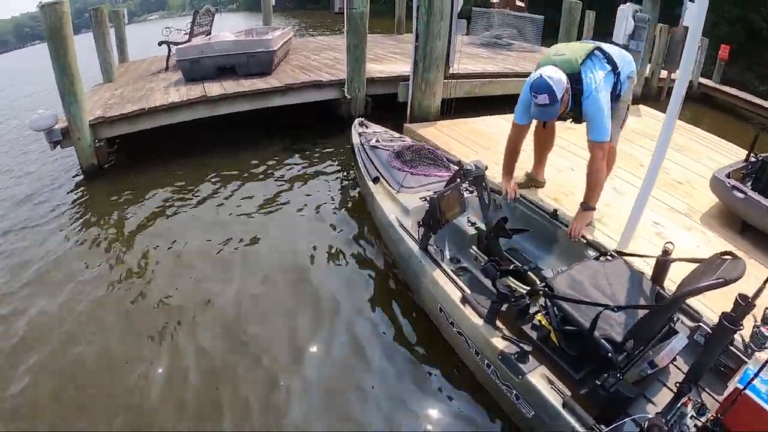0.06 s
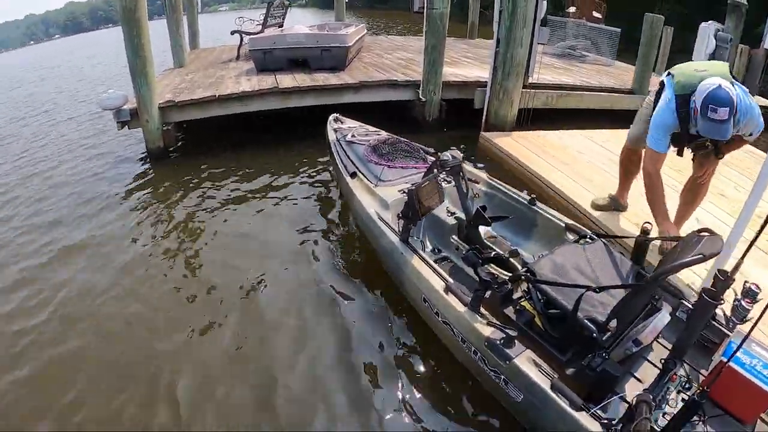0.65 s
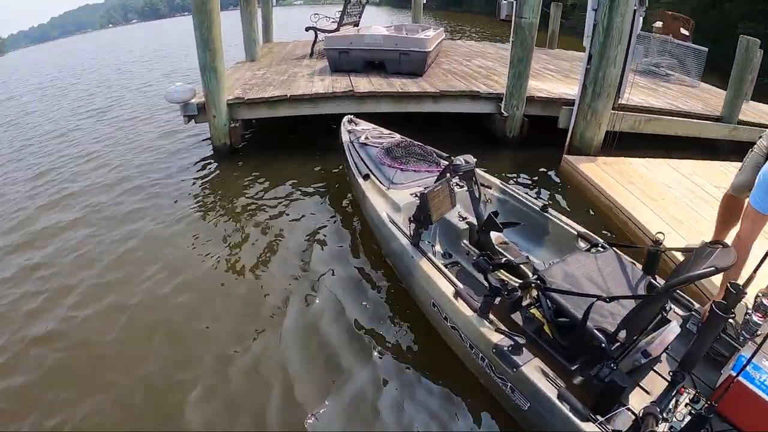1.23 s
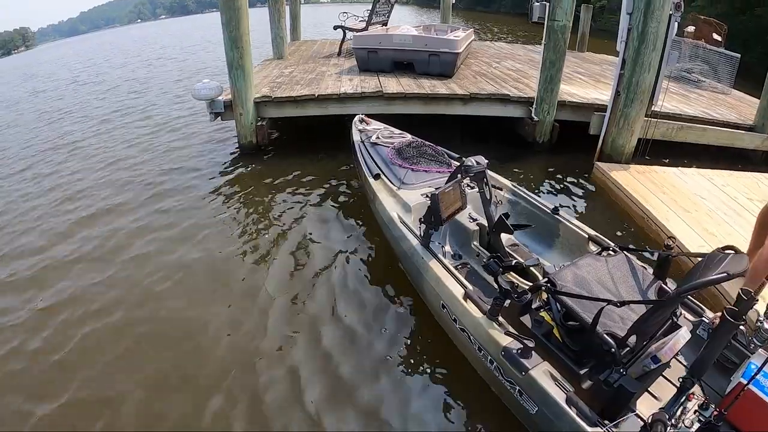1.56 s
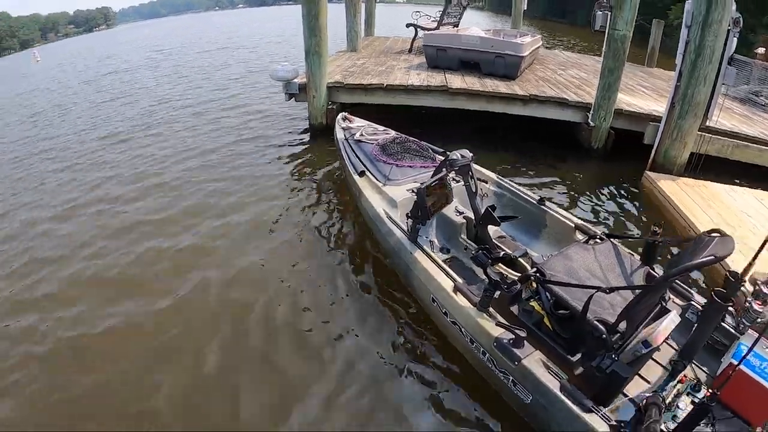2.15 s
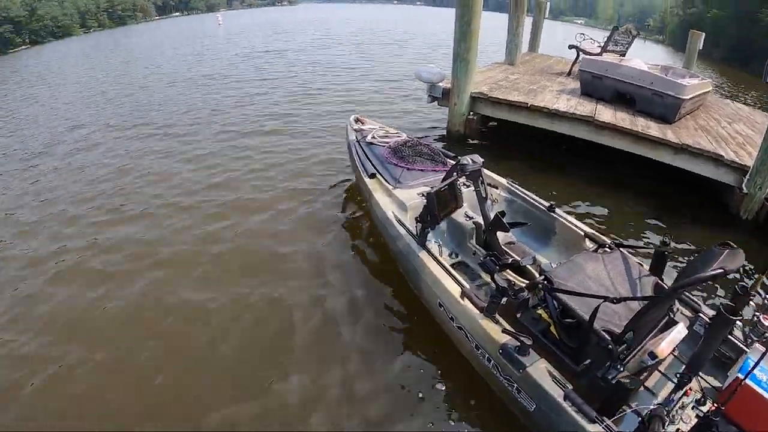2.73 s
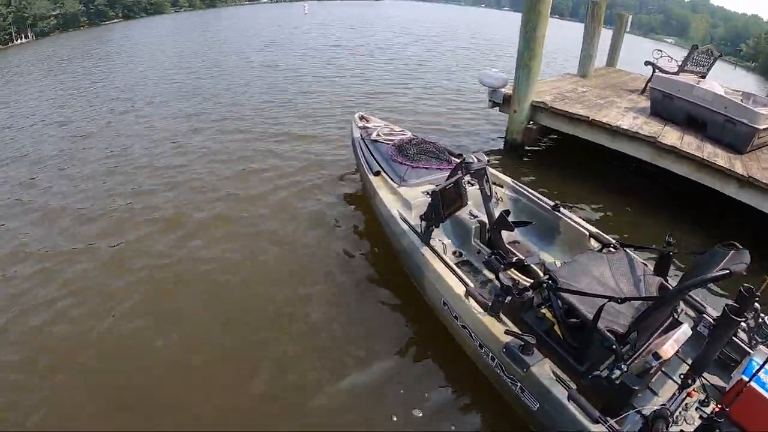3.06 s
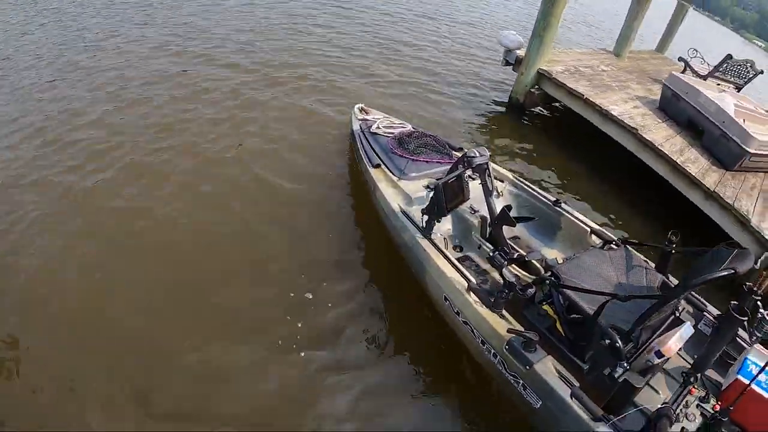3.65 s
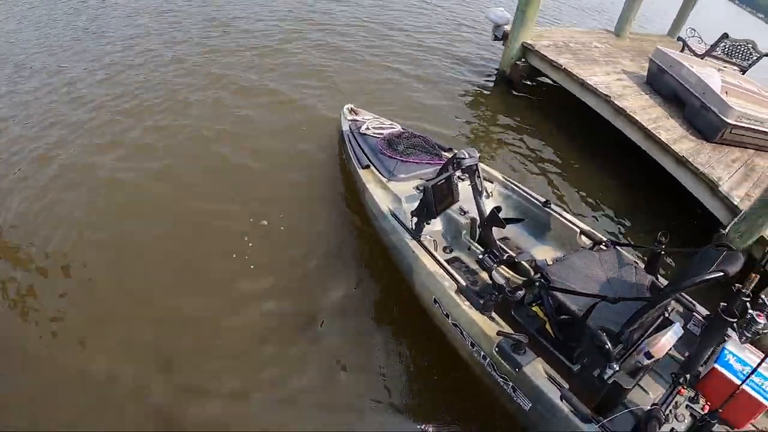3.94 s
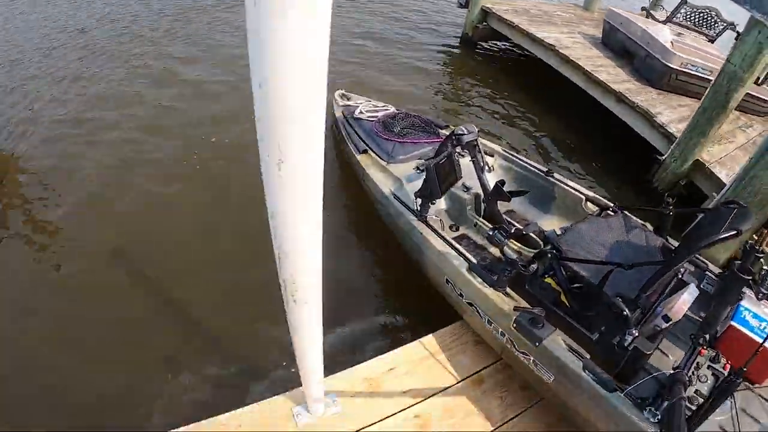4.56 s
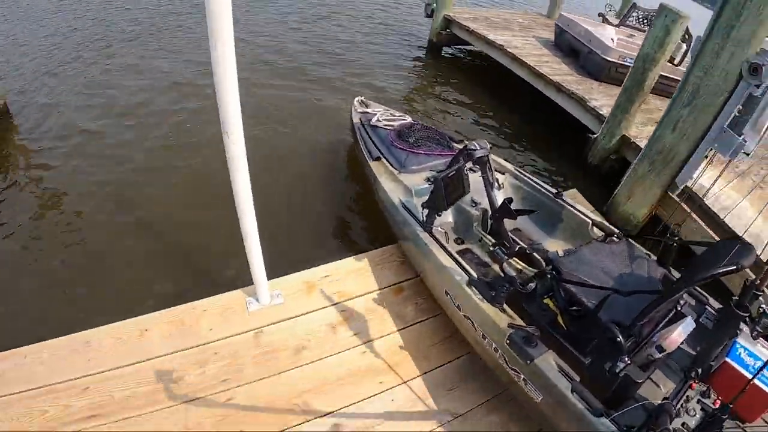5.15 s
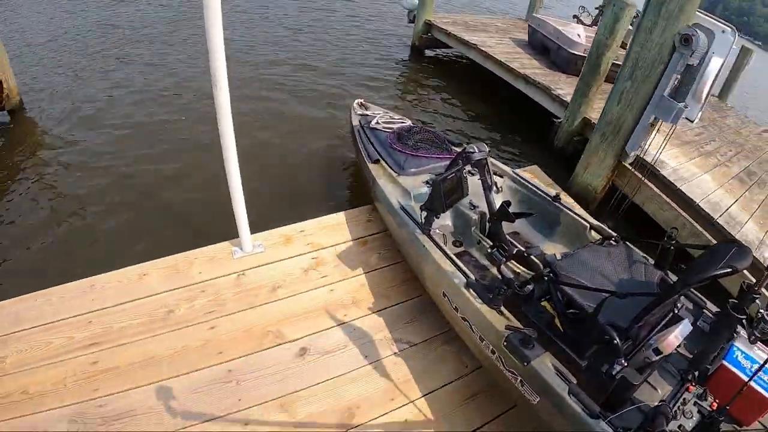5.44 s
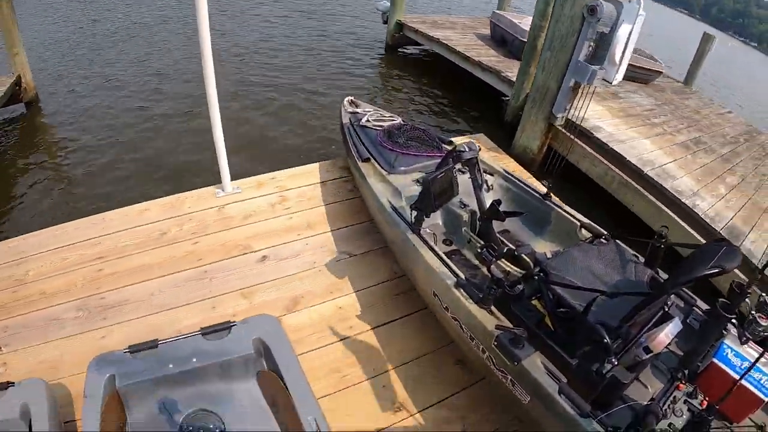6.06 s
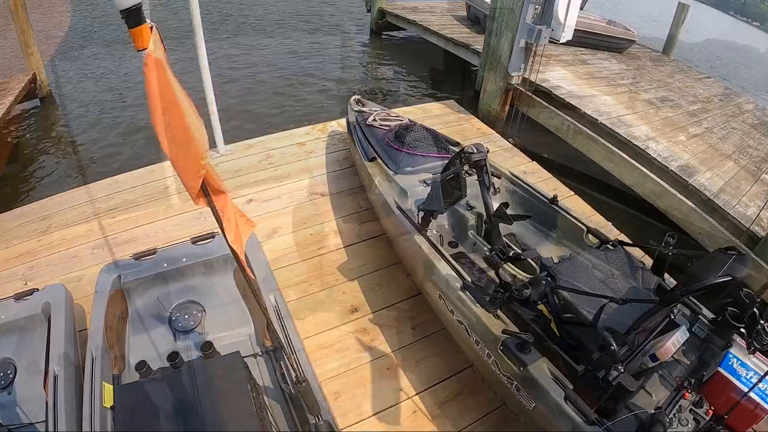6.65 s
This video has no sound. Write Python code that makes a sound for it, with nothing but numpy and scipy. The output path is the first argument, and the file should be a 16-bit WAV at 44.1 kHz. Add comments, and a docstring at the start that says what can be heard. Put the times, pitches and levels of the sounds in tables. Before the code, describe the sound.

Water drips and laps softly as a plastic kayak thumps against a dock, its gear clacking, and is dragged over wooden boards.

```python
"""Water laps and drips, then a hollow plastic fishing kayak bumps a wooden dock and its fittings rattle.
The kayak is led along the dock and hauled up onto it, so the hull scrapes over the planks
while slaps of water trap pockets of air that plop under it. Gear clicks and rustles close by,
gusts touch the microphone, and a faint hum lies under the quiet lake."""
import sys
import numpy as np
from scipy import signal
from scipy.fft import rfft, irfft, next_fast_len
from scipy.io import wavfile
from scipy.ndimage import uniform_filter1d

SR = 44100
rng = np.random.default_rng(int(sys.argv[2]) if len(sys.argv) > 2 else 0)


def inscribe(sig):
    """Save sig as 16-bit PCM at rate SR to the path in sys.argv[1].

    A 1-D sig is mono; a 2-D sig holds one channel per row.
    Samples are clipped to [-1, 1] before scaling.
    """
    pcm = np.round(np.clip(np.atleast_2d(sig).T, -1, 1) * 32767)
    wavfile.write(sys.argv[1], SR, pcm.astype(np.int16))


N = 299873
TIME = np.arange(N) / SR

# Tone colours of noises. Each row: frequency in Hz, relative strength there in dB.
AIR_COLOUR = [(880, -43), (1500, -7), (2590, -16), (4080, -2), (5170, -40), (10300, -5), (15100, -7),
              (16000, -6)]
SLOSH_COLOUR = [(15, -38), (25, -19), (54, -7.5), (125, -7), (156, -5), (219, -2.5), (291, -9), (320, -7.5),
                (382, -14), (420, -10.5), (550, -22), (920, -120)]
RUMBLE_COLOUR = [(15, -51), (25, -28), (75, -15), (129, -12), (214, -2.5), (259, -4.5), (313, -3.5),
                 (344, -23), (420, -4), (550, -54), (920, -120)]
LAPPING_COLOUR = [(210, -38), (360, 6), (392, -53), (420, -4), (709, -3.5), (766, -17.5), (835, -10),
                  (1410, -15), (2800, -46), (3640, -33), (6160, -120)]
GRINDING_COLOUR = [(210, -6), (360, -1), (417, -7.5), (446, 1.5), (577, 2.5), (864, -6.5), (958, -6),
                   (1180, -9), (2800, -26.5), (3640, -45), (6160, -120)]
HISS_COLOUR = [(1410, -12), (2400, -11), (3200, 0.5), (4050, -0.5), (4830, -3.5), (5400, -4.5),
               (5900, -6.5), (6700, -4), (8300, -3.5), (10400, -1), (12000, -3), (14100, -4), (16000, -16)]
FIZZ_COLOUR = [(1400, -39), (2800, 0), (5000, -1), (9000, -0.5), (15000, -10)]
WIND_COLOUR = [(20, -12), (55, 6.5), (140, 0.5), (260, -13)]
FABRIC_COLOUR = [(710, -54), (1200, 3), (2430, 2), (3010, 2), (4220, 3), (5650, 5), (10400, 0), (13500, -6),
                 (16000, -7)]
FROTH_COLOUR = [(1400, -6), (2000, -3), (3000, -1), (4500, -5.5), (7000, -9.5), (9000, -12)]
SHRILL_COLOUR = [(5100, -12), (5400, -5), (5700, -11)]
FLAG_COLOUR = [(1200, -3), (3000, -4), (4200, 1), (5600, -3), (10400, 1), (13500, -3), (16000, -7)]
# Sounds that swell and die away. Each row: start, loudest moment and end in seconds, level in dB.
# A row that ends before it starts is silent.
SPLASHES = [(.16, .21, 0.33, -53.5), (2.365, 2.378, 2.39, -48.5), (2.4, 2.44, 2.66, -55.5),
            (2.53, 2.54, 2.56, -57), (3.26, 3.274, 3.21, -35), (3.365, 3.382, 3.52, -52.5),
            (3.484, 3.492, 3.53, -39), (3.49, 3.565, 3.98, -45.5), (3.62, 3.655, 2.9, -76),
            (4.01, 4.025, 4.16, -45), (4.075, 4.09, 4.13, -43), (4.125, 4.145, 3.7, -46),
            (4.8, 4.826, 4.87, -45), (4.86, 4.9, 4.45, -41), (5.37, 5.41, 5.55, -49.5)]
GUSTS = [(.4, 1.1, 2.1, -53), (4.5, 4.7, 5.1, -39), (6.47, 6.52, 6.87, -31)]
SWISHES = [(.44, .5, 0.58, -41), (.51, .532, 0.56, -35.5), (4.21, 4.274, 4.55, -47), (4.4, 4.42, 4.52, -50),
           (5.85, 6.23, 7.4, -53.5)]
GURGLES = [(2.08, 2.3, 2.52, -50.5), (3.49, 3.57, 4.33, -51), (3.95, 4.08, 4.4, -54.5)]
FLAG = [(6.35, 6.46, 6.525, -36)]

# A distant hum. Each row: pitch in Hz, level in dB.
HUM_TONES = [(161.5, -57), (323, -48.5), (425.3, -58.5)]
# How hard the hull is dragged. Each row: time in seconds, effort in dB.
EFFORT = [(0.0, -52), (0.51, -50), (0.91, -57), (2.56, -53.5), (2.93, -52.5), (3.27, -49.5), (3.56, -52),
          (3.88, -37.5), (4.22, -39.5), (4.53, -58.5), (4.7, -33.5), (4.85, -39.5), (5.15, -43),
          (5.74, -42.5), (5.81, -41), (6.48, -36.5), (6.7, -44.5), (6.8, -42)]
# How much of the hull lies on the planks. Each row: time in seconds, share from 0 to 1.
AGROUND = [(0, 0.17), (3.3, 0.27), (3.8, 0.68), (4.25, 0.45), (4.7, 1), (6.8, 0.91)]
# The nearest drops. Each row: time in seconds, level in dB, pitch in Hz.
DRIPS = [(0.194, -29.5, 7440), (0.528, -24, 4670), (0.604, -33, 7300), (0.632, -27, 2350),
         (0.695, -38, 5070), (0.741, -33.5, 8100), (0.8063, -34, 3960), (0.895, -35, 3580),
         (1.057, -36, 5900), (1.289, -38, 6040), (2.0197, -31.5, 3290), (2.0454, -30.5, 7800),
         (2.333, -24.5, 3410), (2.432, -21, 1400), (2.4875, -28.5, 3720), (2.6, -28.5, 5040),
         (2.618, -29.5, 1260), (2.8051, -25.5, 2930), (2.909, -29, 1700), (3.0041, -32, 2920),
         (3.148, -29.5, 3860), (3.178, -31, 5300), (3.3757, -22.5, 5570), (3.527, -25.5, 3380),
         (3.557, -24, 2700), (3.58, -41, 1680), (3.652, -30, 2000), (3.672, -26, 2790), (3.847, -34, 4000),
         (3.9285, -24, 4500), (4.088, -16, 4050), (4.212, -30, 4430), (4.821, -26, 4190)]
# A fade time (t60) is how long a ring takes to fall by 60 dB. A mode is one tone that an object rings at.
# The four bands of a blow: boom, knock, clack and tick. Each row: low and high edge in Hz,
# multiple of the blow's fade time, boost of the dense overtones in dB.
BLOW_BANDS = [(36, 414, 2.56, 0), (418, 864, 1.72, 5.5), (934, 2440, 0.6, -2), (3040, 10800, 1.17, 40)]
# The hull hits the dock. Each row: time in seconds; level, panel ring and brightness in dB;
# base fade time in seconds; pitch in Hz; boost of the side wall in dB.
BUMPS = [(0.302, -18, 6, 12, 0.044, 239, -7), (0.311, -12, -11, -2, 0.082, 205, -10),
         (0.329, -18, 3.5, 5.5, 0.12, 199, -4), (1.195, -39, 6, -22, 0.18, 199, 1),
         (1.645, -26, -2.5, -10, 0.1, 207.4, 4), (1.912, -12, -2, -7, 0.044, 216.6, -6),
         (1.938, -21.5, -1, -6, 0.094, 212, -10), (3.107, -28, -6, -13, 0.13, 216.5, -14),
         (3.132, -25.5, -6, -14, 0.23, 212.4, -7), (3.174, -25.5, 3, -8, 0.048, 213, 2),
         (3.194, -20.5, -10, -18, 0.061, 214, 10.5), (3.272, -28.5, 1, -7, 0.12, 215.4, -4),
         (3.712, -14, -3, -9, 0.1, 215.7, 10), (3.73, -24.5, 8, 5.5, .085, 222.6, -3),
         (3.789, -19, -12, -12, 0.052, 217, 3), (3.823, -18.5, -2, 4, 0.053, 204, 2),
         (4.259, -23, -2, 0, .06, 160, -7), (4.292, -20, 2, 14, 0.075, 211, -8),
         (4.363, -19, 7.5, -4, 0.033, 234, 1), (4.378, -17.5, 3, 8.5, 0.027, 221, 3),
         (4.400, -22, 8, 5, 0.014, 195, 12), (4.648, -38, 13, 8, 0.087, 236, 0),
         (4.66, -19.5, 8, 2, 0.063, 243, 8.5), (4.701, -23.5, 9, 7, 0.027, 221, 8),
         (4.721, -24, 4, 3.5, 0.048, 237, 1), (6.487, -14, 3.5, 9, 0.074, 228, 7),
         (6.513, -17.5, 6.5, -2, 0.097, 225.6, 6), (6.586, -15, 7, 1, 0.067, 229.4, 5.5)]
# The whole hull, and one panel. Each row: multiple of the pitch, level in dB, multiple of the fade time.
HULL_MODES = [(.769, -10, 2.16), (1, 0, 1.92), (1.2, -10, 2.1), (2.5, -2, 0.69), (2.85, -3.5, 0.81),
              (3.5, -15, 0.43), (5.07, -9.5, 0.6), (6.05, -8.5, 0.24), (7.6, -15, 0.47)]
PANEL_MODES = [(0.409, -19, 5.8), (0.999, -0.5, 0.87), (1.109, -17.5, 1.2), (1.36, -5, 0.47),
               (1.624, -12.5, 0.82), (1.849, -18.5, 1.7), (2.1, -29, 2.2), (2.75, -15, 0.14),
               (3.4, -48, 1.2)]
# A loose fitting chatters. Each row: start in seconds, level in dB, number of touches.
RATTLES = [(0.308, -20, 1), (0.314, -14, 4), (1.9119, -22.5, 1), (1.921, -30.5, 4), (4.383, -23, 1),
           (4.4103, -35, 1), (4.4147, -25.5, 3), (4.6708, -14.5, 1), (6.1624, -27, 1), (6.2134, -29, 2),
           (6.445, -27, 2)]
# The fitting, and the dock's deck. Each row: pitch in Hz, level in dB, fade time in seconds.
FITTING_MODES = [(4180, -13, 0.023), (4590, -2.5, 0.01), (4790, -9.5, 0.0092), (8100, -8, 0.0025),
                 (9400, -27, 0.008), (12400, -20, .004)]
DOCK_MODES = [(61.5, -5, 0.31), (103, -2.5, 0.2), (135.5, -2, 0.23)]
# The dock gives way a little. Each row: time in seconds, level in dB.
THUDS = [(0.324, -25), (1.923, -29), (3.816, -28.5), (4.385, -30), (4.664, -33.5), (6.507, -23.5)]
# Hollow knocks. Each row: time in seconds, level and brightness in dB, pitch in Hz,
# base fade time in seconds.
KNOCKS = [(0.374, -47.5, 5, 506, 0.047), (1.362, -53, -1.5, 555, 0.048), (2.431, -56, 10.5, 657, .09),
          (2.616, -46, 1, 496, 0.056), (2.908, -56.5, 6, 480, 0.062), (3.486, -46, -3, 555, 0.091),
          (3.867, -24, -2, 486, 0.04), (3.89, -30, -7, 634, 0.039), (4.239, -37, 5.5, 603, 0.054),
          (4.502, -37.5, -3.5, 649, 0.1), (4.776, -35, -3.5, 553, 0.11), (4.903, -43.5, -7, 565, 0.06),
          (5.5, -38.5, -15, 573, 0.096), (5.753, -38, -13, 562, 0.12), (5.826, -37.5, -10, 570, 0.14),
          (6.181, -34.5, 4.5, 578, 0.085), (6.34, -33, -22, 688, 0.058), (6.366, -39, -22, 554, 0.061)]
# Light clicks of gear. Each row: time in seconds, level in dB, centre frequency in Hz.
TICKS = [(.507, -44, 3000), (0.53, -43, 2600), (.537, -47, 2190), (4.09, -33, 5930), (4.721, -37.5, 3920),
         (4.966, -41, 3400), (5.033, -41, 11000), (5.175, -38.5, 4280), (5.217, -43, 11500),
         (5.3, -46, 3600), (5.418, -45, 12000), (5.489, -38.5, 9400), (5.817, -42.5, 8500),
         (6.212, -40, 8500), (6.699, -41, 5800), (6.713, -44, 3470)]
# Sharp snaps of gear. Each row: time in seconds; level, brightness and lean to the left in dB;
# factor on the tick's fade time; base fade time in seconds.
SNAPS = [(3.8668, -47, 18, -0.5, 0.78, 0.041), (4.28, -2, -14.5, -26, 0.29, 0.053),
         (4.4016, -28.5, 2.5, -23, 1, 0.023), (6.497, -35, 14, 18, 0.68, 0.051),
         (6.506, -33.5, 11.5, -16, 0.49, 0.058)]
# Stiff plastic gear. Each row: pitch in Hz, level in dB, multiple of the fade time.
GEAR_MODES = [(175, -8, 2.6), (570, 1.5, 0.91), (753, 3.5, 0.81), (940, -10, 1.3), (1320, -6, 0.7),
              (1580, -4, 0.9), (1840, -14, 1.17)]
# How loud the high, thin noise is. Each row: time in seconds, level in dB.
SHRILL_LEVEL = [(0, -98), (4.7, -90), (5.1, -64), (6.1, -63), (6.5, -76), (6.8, -80)]
# Water slaps under the hull. Each row: time in seconds; slap level, slap brightness and
# air pocket level in dB; pitch in Hz; how long the note holds in seconds.
PLOPS = [(5.013, -30.5, -6.5, -22.5, 517, 0.029), (5.154, -27, -13, -24, 542, 0.027),
         (5.326, -30, -6, -28, 643, 0.0099), (5.656, -25, -3, -26, 582.6, 0.016),
         (5.987, -24.5, -3.5, -17, 535, 0.02), (6.322, -29, -3.5, -42, 486, 0.012),
         (6.778, -31.5, 3.5, -24, 515, 0.02)]
# When the sound spreads between left and right. Each row: start and end in seconds.
WIDE_SPANS = [(.29, 0.4), (1.4, 4.43)]


def from_db(db):
    """Turn decibels into a gain to multiply by."""
    return 10 ** (np.asarray(db) / 20)


def rms_one(x):
    """Scale a sound to an average strength (rms) of 1."""
    return x / np.sqrt(np.mean(x ** 2) + 1e-20)


def curve(rows, s=TIME):
    """Join a table's points with straight lines and read the value at time s."""
    return np.interp(s, *np.transpose(rows))


def seconds(length_s):
    """The time of each sample in a short sound."""
    return np.arange(int(length_s * SR)) / SR


def band(x, low_hz, high_hz, order=2):
    """Keep what lies between two frequencies."""
    edges_hz = [low_hz, min(high_hz, .45 * SR)]
    return signal.sosfilt(signal.butter(order, edges_hz, "band", fs=SR, output="sos"), x)


def fade(t, t60):
    """Die away by 60 dB every t60 seconds."""
    return np.exp(-np.log(1000) * t / max(t60, 1e-3))


def add(out, s, sound):
    """Lay a sound into the scene at time s."""
    start = max(round(s * SR), 0)
    out[..., start:start + sound.shape[-1]] += sound[..., :N - start]


def drift(rate):
    """A smooth random wobble of about size 1; a higher rate wobbles faster."""
    r = np.exp(-80 * np.pi * rate / SR)
    slow = signal.lfilter([1], [1, -2 * r, r * r], rng.standard_normal(N // 40 + 2002))[2000:]
    return np.interp(np.arange(N) / 40, np.arange(len(slow)), rms_one(slow))


def coloured(x, colour):
    """Give a noise a tone colour that falls away steeply beyond the table's ends."""
    hz, db = np.transpose(colour)
    size = next_fast_len(N)
    f = np.maximum(np.fft.rfftfreq(size, 1 / SR), 1)
    octaves_outside = np.abs(np.log2(f / np.clip(f, hz[0], hz[-1])))
    gain = from_db(np.interp(np.log(f), np.log(hz), db) - 36 * octaves_outside)
    return rms_one(irfft(rfft(x, size) * gain, size)[..., :N])


def rough_noise(colour, per_s, grain_db, flutter_db, side_db):
    """Smooth noise plus little catches of uneven size, in spurts; side_db sets how much the ears differ."""
    sizes = from_db(2.44 * np.minimum(rng.exponential(1, (2, N)), 4)) * rng.choice([-1, 1], (2, N))
    grains = rms_one(sizes * (rng.random((2, N)) < per_s / SR))
    spurts = from_db(flutter_db * np.clip(drift(21.7), -2, 2))
    mid, side = coloured((rng.standard_normal((2, N)) + from_db(grain_db) * grains) * spurts, colour)
    return mid + from_db(side_db) * side * [[1], [-1]]


def wandering(x, rate, patchy_db):
    """Sixteen bands of a sound swell and sink on their own, so its colour keeps shifting."""
    size = next_fast_len(N)
    spectrum, out = rfft(x, size), 0
    band_number = 5 * np.log2(np.clip(np.fft.rfftfreq(size, 1 / SR), 1500, 12000) / 1500)
    for k in range(16):
        part = irfft(spectrum * np.maximum(1 - np.abs(band_number - k), 0), size)[..., :N]
        out = out + part * from_db(patchy_db * np.clip(drift(rate), -2, 2))
    return rms_one(out)


def swells(rows):
    """A gain that rises to each row's loudest moment and lets go."""
    return sum(from_db(db) * np.interp(TIME, [start, top, end], [0, 1, 0]) ** 1.69
               for start, top, end, db in rows)


def air():
    """The open air is a smooth, steady hiss."""
    mid, side = coloured(rng.standard_normal((2, N)), AIR_COLOUR)
    return from_db(-72.5) * (mid + from_db(-21) * side * [[1], [-1]])


def hum():
    """Faint, distant tones waver in pitch and strength."""
    out = np.zeros(N)
    for hz, db in HUM_TONES:
        gain = from_db(db + 0.5 * drift(0.88))
        wavering_hz = hz * (1 + 0.00403 * drift(3.51))
        out += gain * np.sin(2 * np.pi * np.cumsum(wavering_hz) / SR)
    return out


def bubble(hz, cycles, rise):
    """A trapped bubble swells, rings and climbs in pitch as it nears the surface."""
    t = seconds(.035)
    return np.sin(2 * np.pi * hz * (t + rise * t ** 2)) * fade(t, cycles / hz) * (1 - np.exp(-t * hz / 3))


def trickle(per_s, low_hz, high_hz, size_db):
    """A spray of bubbles, scattered from the centre to the right: most burst at once and a few ring on."""
    out = np.zeros((2, N))
    for when, pitch, size, length, rise, place in rng.random((int(per_s * N / SR), 6)):
        ring = bubble(low_hz * (high_hz / low_hz) ** pitch, cycles=3 + 14 * length ** 3, rise=6 * rise)
        pan_db = 3.1 * (place - 1) * np.array([[1], [-1]])
        add(out, when * (N - 1) / SR, from_db(size_db * size + pan_db) * ring)
    power = uniform_filter1d((out ** 2).mean(0), size=6000)
    return out / np.sqrt(np.maximum(power, 0) + 0.26 * power.mean())  # even out the loudness


def driven(full_db, slope):
    """A gain that is full_db at full effort and moves by slope dB for each dB of effort."""
    full_effort_db = -41
    return from_db(full_db + slope * (curve(EFFORT) - full_effort_db))


def hull_slide():
    """Water sloshes, laps and trickles round the hull; aground, it rumbles, grinds and hisses on wood."""
    slosh = rough_noise(SLOSH_COLOUR, per_s=51, grain_db=-6, flutter_db=7, side_db=-7)
    rumble = rough_noise(RUMBLE_COLOUR, per_s=30, grain_db=-3.5, flutter_db=10.5, side_db=11)
    lapping = rough_noise(LAPPING_COLOUR, per_s=41, grain_db=0, flutter_db=2.5, side_db=-18)
    grinding = rough_noise(GRINDING_COLOUR, per_s=240, grain_db=-13.5, flutter_db=2.5, side_db=-4)
    droplets = trickle(per_s=750, low_hz=2630, high_hz=13000, size_db=18)
    hiss = rough_noise(HISS_COLOUR, per_s=68, grain_db=-17.5, flutter_db=6, side_db=1)
    hiss = wandering(hiss, rate=18, patchy_db=1.5)
    water = driven(-38.5, 0.64) * slosh + driven(-44.5, 0.66) * lapping + driven(-52.5, 1.7) * droplets
    wood = driven(-46, 0.88) * rumble + driven(-42.5, 1) * grinding + driven(-50.5, 0.81) * hiss
    aground = curve(AGROUND)
    return np.sqrt(1 - aground) * water + np.sqrt(aground) * wood


def splashes():
    """Small waves break on the hull into a gritty fizz and bubbles."""
    bubbles = trickle(per_s=500, low_hz=2600, high_hz=11000, size_db=20)
    fizz = rough_noise(FIZZ_COLOUR, per_s=350, grain_db=1, flutter_db=2.5, side_db=-3.5)
    fizz = wandering(fizz, rate=36, patchy_db=3)
    return swells(SPLASHES) * (from_db(-6.5) * bubbles + from_db(3) * fizz)


def stray_drops(tries_per_s=9, level_db=-45, spread_db=4, low_hz=5000, high_hz=10000):
    """Small drops fall at random, more rarely as the hull leaves the water; rows as in DRIPS."""
    for when, size, pitch, chance in rng.random((int(tries_per_s * N / SR), 4)):
        s = when * (N - 1) / SR
        if chance > curve(AGROUND, s):
            yield s, level_db + spread_db * (2 * size - 1), low_hz * (high_hz / low_hz) ** pitch


def drips():
    """A drop ticks on the surface, splashes and traps a bubble."""
    out = np.zeros(N)
    for s, level_db, hz in [*DRIPS, *stray_drops()]:
        ring = bubble(hz, cycles=60, rise=4)
        t = np.arange(len(ring)) / SR
        spray = band(rng.standard_normal(len(t)), 0.72 * hz, 1.276 * hz, order=3)
        splash = spray * fade(t, 0.069) * (1 - np.exp(-t * hz / 4))
        tick = band(rng.standard_normal(len(t)), 0.22 * hz, 3 * hz, order=1) * fade(t, 0.015)
        add(out, s, from_db(level_db - 8) * (ring + from_db(-3) * splash + from_db(-6.5) * tick))
    return out


def band_levels(level_db, bright_db, balance_db, tilt):
    """Levels of boom, knock, clack and tick: a harder contact lifts the upper ones."""
    return level_db + np.array(balance_db) + bright_db * np.array(tilt)


def struck(modes, levels_db, t60, rebound, dense_db, tick_share, press_s, choke, low_cut_hz):
    """A contact and two rebounds ring an object's modes and a wash of overtones, in four bands."""
    t = seconds(.35)
    bent_time = t60 * (t / max(t60, 1e-3)) ** choke  # choke below 1: a sharp crack, then a lingering tail
    ring = 0
    for hz, db, share in modes:
        gain = from_db(db + 2.2 * rng.standard_normal())
        tone = np.sin(2 * np.pi * hz * (1 + 0.02 * rng.standard_normal()) * t)
        ring += gain * tone * rng.choice([-1, 1]) * fade(bent_time, t60 * share)
    contacts = np.zeros(len(t))
    contacts[0] = 1
    rebounds = rebound * rng.uniform(0.42, 1, 2)
    rebound_s = rng.uniform([.003, .008], [.008, .018])
    contacts[(rebound_s * SR).astype(int)] = rebounds
    press = 1 - np.exp(-t / max(press_s, 1e-4))  # the force takes a moment to build
    bands = []
    for (low_hz, high_hz, share, wash_db), db, shorten in zip(BLOW_BANDS, levels_db, [1, 1, 1, tick_share]):
        wash = rms_one(band(rng.standard_normal(len(t)), 110, 1030, order=1))
        wash *= from_db(wash_db + dense_db) * fade(t, t60 * share * shorten)
        sound = signal.fftconvolve(contacts, press * (ring + wash))[:len(t)]
        sound = band(sound, max(low_hz, low_cut_hz), high_hz, order=3)
        opening_rms = np.sqrt(np.mean(sound[t < .03] ** 2))
        bands.append(from_db(db) * sound / opening_rms)
    return np.array(bands)


def blow(modes, levels_db, t60, pan_db, **contact):
    """A blow in both ears: its body leans to one side, while its tick is equally loud in both."""
    right, unlike = [struck(modes, levels_db, t60, **contact) for ear in range(2)]
    alike = from_db(-abs(pan_db) * np.array([[.55], [.55], [.5], [.16]]))
    left = alike * right + np.sqrt(1 - alike ** 2) * unlike
    ratio = from_db(pan_db)
    body = np.array([ratio * left[:-1].sum(0), right[:-1].sum(0)]) * np.sqrt(2 / (1 + ratio ** 2))
    return body + np.array([left[-1], right[-1]])


def hull_bumps():
    """The whole hull booms against the dock; pitch and ring depend on where it hits and how it is held."""
    out = np.zeros((2, N))
    for s, level_db, panel_db, bright_db, t60, pitch_hz, wall_db in BUMPS:
        side_wall = (1.5, wall_db - 3, 1.12)  # one more mode of the hull
        modes = [(pitch_hz * multiple, db, share) for multiple, db, share in [*HULL_MODES, side_wall]]
        levels_db = band_levels(level_db, bright_db, [-7, -12.5, -18.5, -35.5], tilt=[0, 0.033, 0.89, 0.5])
        levels_db[1] += panel_db
        add(out, s - .001, blow(modes, levels_db, t60, pan_db=-15.5, rebound=0.72, dense_db=-9.5,
                                tick_share=0.58, press_s=0.00093, choke=0.88, low_cut_hz=108))
    return out


def fitting_rattle(first_gap_s=.018, gap_shrink=.93, loss_db=0.74):
    """A loose fitting bounces ever sooner and weaker; each touch rings its few bright modes."""
    out, t = np.zeros(N), seconds(.03)
    for s, level_db, touches in RATTLES:
        for k in range(round(touches)):
            detune = 1 + .025 * rng.standard_normal()
            ring = sum(from_db(db + rng.standard_normal()) * np.sin(2 * np.pi * hz * detune * t)
                       * fade(t, t60) for hz, db, t60 in FITTING_MODES)
            add(out, s, from_db(level_db - loss_db * k ** 2 - 4) * ring)
            s += first_gap_s * gap_shrink ** k
    return out


def dock_thuds(attack_s=0.0087):
    """The floating dock gives under the heavier bumps, and its deck answers slowly and low."""
    out, t = np.zeros(N), seconds(.3)
    for s, level_db in THUDS:
        ring = sum(from_db(db) * np.sin(2 * np.pi * (hz * t + rng.random())) * fade(t, t60)
                   for hz, db, t60 in DOCK_MODES)
        add(out, s, from_db(level_db) * ring * (1 - np.exp(-t / attack_s)))
    return out * from_db([[-7], [4]])  # louder on the right


def panel_knock(s, level_db, bright_db, pitch_hz, t60):
    """One blow on a hull panel; its pitch depends on where it is hit."""
    modes = [(pitch_hz * multiple, db, share) for multiple, db, share in PANEL_MODES]
    levels_db = band_levels(level_db, bright_db, [10, 4, -1, -17.5], tilt=[0.12, 0.012, 1, 0.74])
    levels_db[0] -= 33 * curve(AGROUND, s) ** 2  # lying on the planks, the hull hardly booms
    return blow(modes, levels_db, t60, pan_db=-5, rebound=0.31, dense_db=-9,
                tick_share=0.23, press_s=0.00097, choke=0.93, low_cut_hz=199)


def hull_knocks():
    """A hull panel is slapped by a small wave or catches on a plank."""
    out = np.zeros((2, N))
    for s, level_db, bright_db, pitch_hz, t60 in KNOCKS:
        add(out, s - .001, panel_knock(s, level_db, bright_db, pitch_hz, t60))
    return out


def gusts():
    """Wind thumps softly on the microphone."""
    return swells(GUSTS) * rough_noise(WIND_COLOUR, per_s=49, grain_db=-1, flutter_db=7, side_db=-10)


def fabric_swishes():
    """Fabric brushes past, crackling finely."""
    rustle = rough_noise(FABRIC_COLOUR, per_s=790, grain_db=6, flutter_db=6, side_db=-14)
    return swells(SWISHES) * wandering(rustle, rate=33, patchy_db=4)


def gear_ticks():
    """Gear makes small, dry clicks, each with its own colour."""
    out, t = np.zeros(N), seconds(.05)
    for s, level_db, hz in TICKS:
        noise = rms_one(band(rng.standard_normal(len(t)), 0.64 * hz, 1.4 * hz))
        add(out, s, from_db(level_db) * noise * fade(t, 0.019))
    return out


def gurgles():
    """Water runs off the hull and froths; clouds of tiny bubbles merge into a soft, shifting wash."""
    froth = rough_noise(FROTH_COLOUR, per_s=360, grain_db=-1.5, flutter_db=5, side_db=-11)
    return swells(GURGLES) * wandering(froth, rate=32, patchy_db=4.5)


def gear_snaps():
    """Hard plastic meets hard plastic in one short crack."""
    out = np.zeros((2, N))
    for s, level_db, bright_db, pan_db, tick_share, t60 in SNAPS:
        levels_db = band_levels(level_db, bright_db, [-13.5, 3.5, -2, -6.5], tilt=[0, 0.36, 0.89, 1.09])
        add(out, s, blow(GEAR_MODES, levels_db, t60, pan_db, rebound=0.018, dense_db=-10.5,
                         tick_share=tick_share, press_s=0.0001, choke=0.6, low_cut_hz=114))
    return out


def shrill():
    """A faint, thin band of noise comes in high above the scraping."""
    return from_db(curve(SHRILL_LEVEL)) * coloured(rng.standard_normal(N), SHRILL_COLOUR)


def plops(attack_s=0.0006, settle_s=0.0031):
    """A slap shuts in a pocket of air, which sounds one round note until the water lets it out."""
    out, t = np.zeros((2, N)), seconds(.15)
    for s, slap_db, bright_db, pocket_db, pitch_hz, hold_s in PLOPS:
        hz = pitch_hz * (1 + 0.12 * np.exp(-t / settle_s))  # starts a little high, then settles
        loudness = (1 - np.exp(-t / attack_s)) * fade(np.maximum(t - hold_s, 0), t60=0.059)
        add(out, s - .001, panel_knock(s, slap_db, bright_db, pitch_hz, t60=0.076))
        add(out, s, from_db(pocket_db) * loudness * np.sin(2 * np.pi * np.cumsum(hz) / SR))
    return out


def flag():
    """A small flag's thin cloth drags past the microphone in a bright, swelling hiss."""
    return swells(FLAG) * rough_noise(FLAG_COLOUR, per_s=1500, grain_db=-4, flutter_db=1, side_db=-15)


def width(widen_db_per_s=108, narrow_db_per_s=236):
    """How much the ears differ: fully inside the wide spans, shrinking to one point outside them."""
    spans_db = [np.minimum(widen_db_per_s * (TIME - start), narrow_db_per_s * (end - TIME))
                for start, end in WIDE_SPANS]
    return from_db(np.minimum(np.max(spans_db, axis=0), 0))


def limiter(x, limit_db=-2, release_db_per_s=108):
    """A peak over the limit pushes the volume down at once; it then creeps back."""
    over_db = np.maximum(20 * np.log10(np.abs(x).max(0) + 1e-9) - limit_db, 0)
    recovery_db = release_db_per_s * TIME
    return x * from_db(recovery_db - np.maximum.accumulate(over_db + recovery_db))


def scene():
    """Add up the water, the blows, the rubbing and the background."""
    water = plops() + drips() + splashes() + gurgles()
    blows = hull_bumps() + dock_thuds() + hull_knocks() + gear_snaps() + fitting_rattle() + gear_ticks()
    rubbing = hull_slide() + fabric_swishes() + flag()
    return water + blows + rubbing + gusts() + hum() + air() + shrill()


def record(dry):
    """The sound widens and narrows, a limiter ducks after the loudest crack and the top treble is cut."""
    cutoff_hz = 16200
    mid = dry.mean(0)
    heard = limiter(mid + (dry - mid) * width())
    return signal.sosfilt(signal.ellip(10, .1, 90, cutoff_hz, fs=SR, output="sos"), heard)


dry = scene()
out = record(dry)
inscribe(out)
```